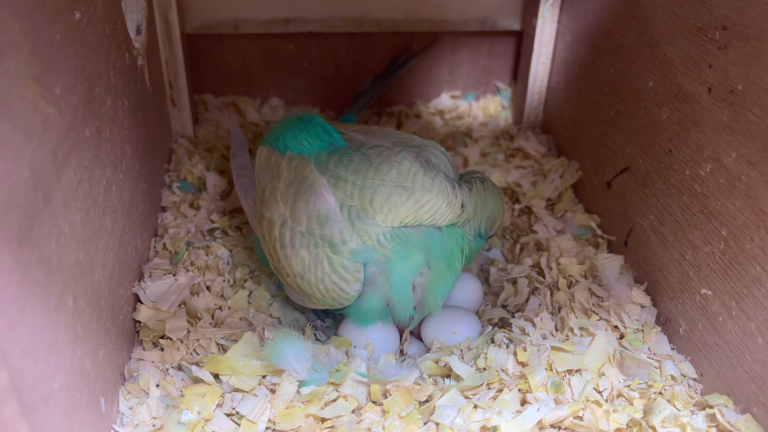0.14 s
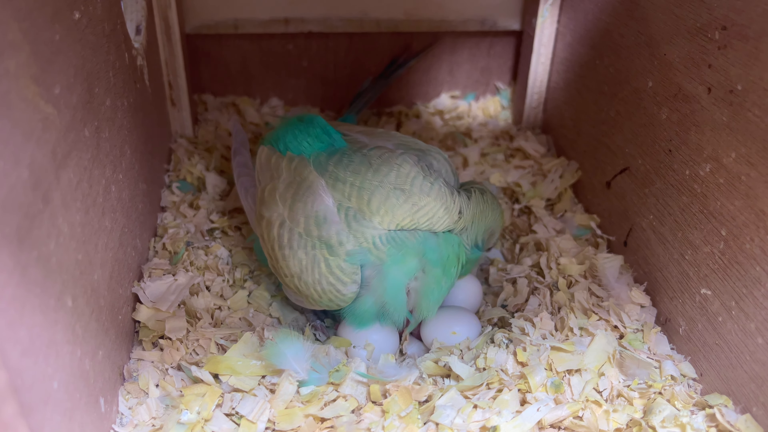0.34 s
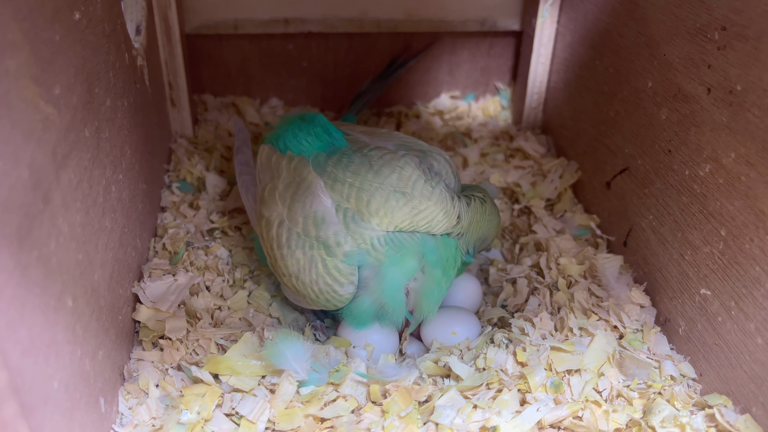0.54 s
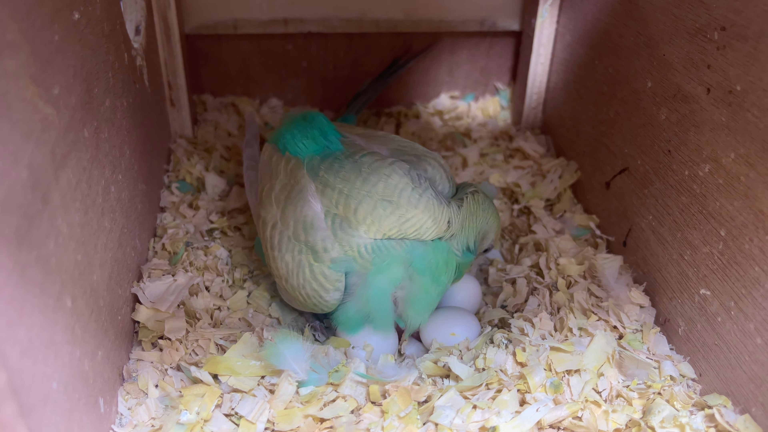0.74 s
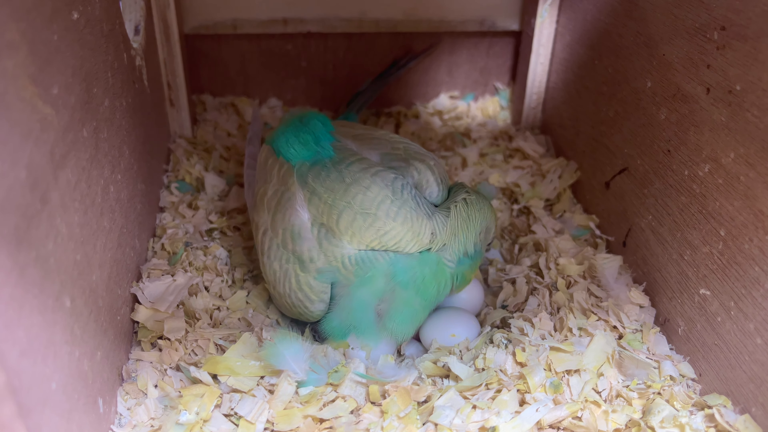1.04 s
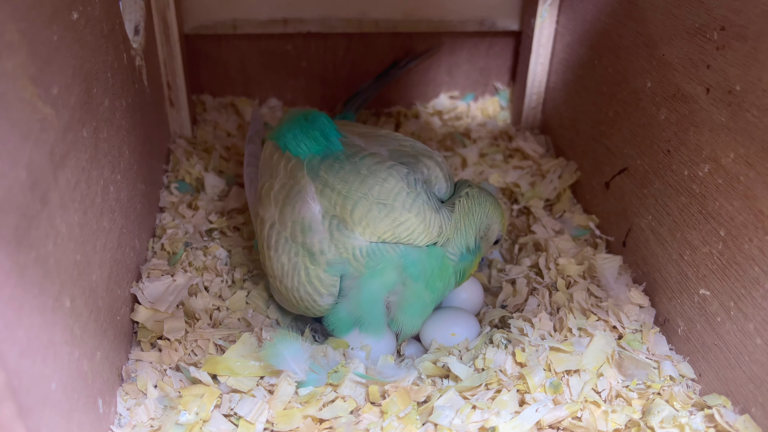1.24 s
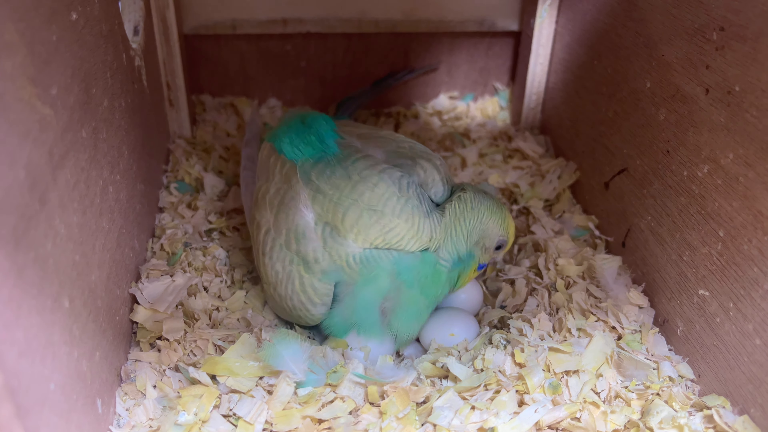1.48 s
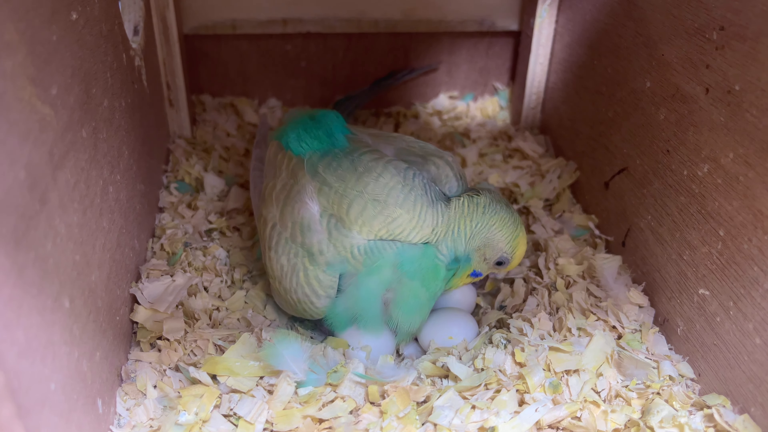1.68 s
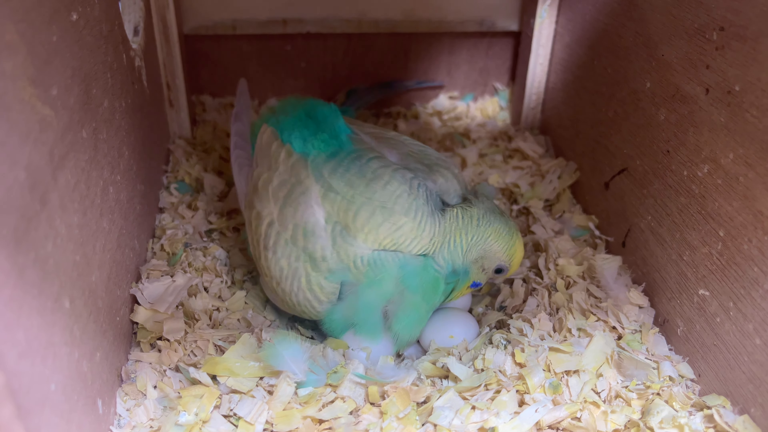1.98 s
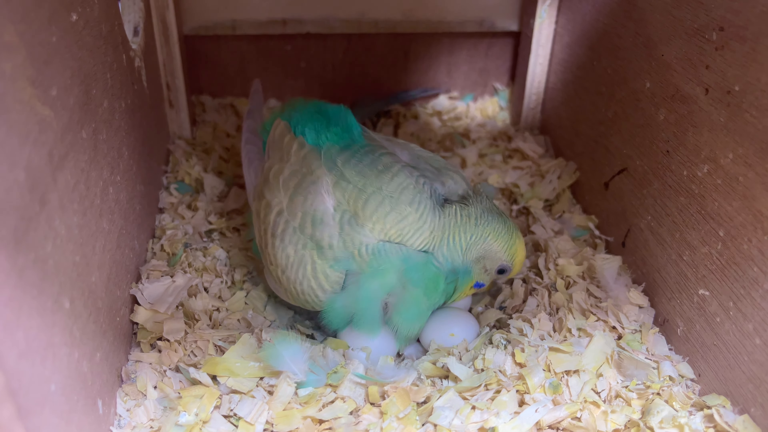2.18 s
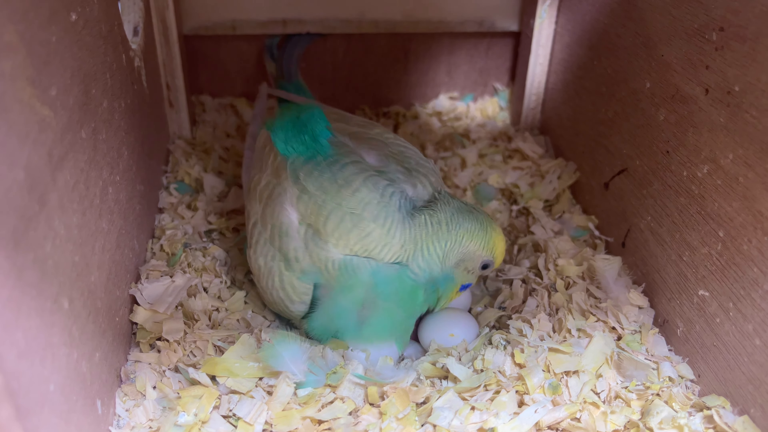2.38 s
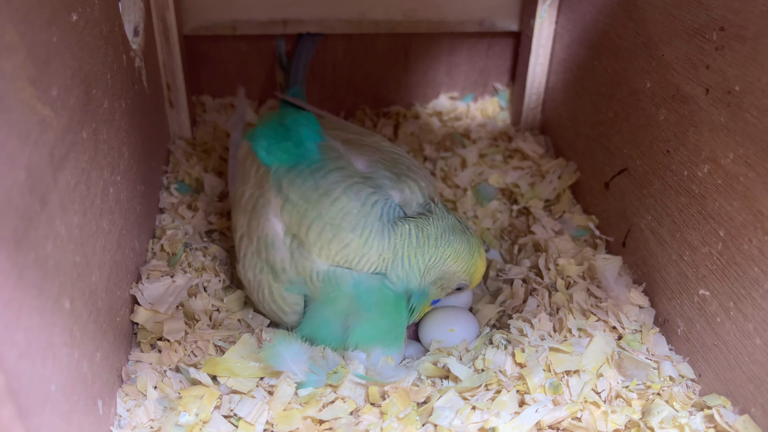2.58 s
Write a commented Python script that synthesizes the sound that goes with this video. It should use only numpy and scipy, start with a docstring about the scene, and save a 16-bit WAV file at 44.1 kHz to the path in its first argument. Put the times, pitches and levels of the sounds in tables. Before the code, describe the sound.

Short hoarse squawks of a small parrot outside a wooden nest box, after a high trill at 0-0.2 s, recur from 0.2 to 2.4 s. Close to the microphone a hen rumbles and scrapes, with a strong thump at 0.8 s. Shuffling eases around 1.4-1.75 s despite a knock, then resumes with crackly scratches near 2 s. Rough chips, warble and trills finish from 2.25 s over faint hiss.

```python
"""First a high trill over a faint rumble and hiss; then a small parrot squawks hoarsely again and again outside
a wooden nest box in a small room. Trills, chips and a low warble are tones on moving pitches; squawks are uneven
clicks and puffs of air through a throat. The hen shuffles on the shavings near the microphone: shaped noise
rumbles, scrapes, rustles and scratches, while fading tones make the box thump and knock. Grainy noise also adds
rough chatter near the end."""
import sys
import numpy as np
from scipy import signal
from scipy.fft import rfft, irfft, next_fast_len
from scipy.io import wavfile
from scipy.ndimage import uniform_filter1d, map_coordinates

SR = 44100
rng = np.random.default_rng(int(sys.argv[2]) if len(sys.argv) > 2 else 0)


def level_to_linear(level):
    """Convert decibel levels to linear amplitude factors, elementwise."""
    exponent = np.asarray(level, float) / 20
    return 10 ** exponent


def inscribe(sig):
    """Save sig as 16-bit PCM at rate SR to the path in sys.argv[1].

    A 1-D sig is mono; a 2-D sig holds one channel per row.
    Samples are clipped to [-1, 1] before scaling.
    """
    pcm = np.round(np.clip(np.atleast_2d(sig).T, -1, 1) * 32767)
    wavfile.write(sys.argv[1], SR, pcm.astype(np.int16))


N = 119070  # samples, 2.7 s

# Background hiss of far birds and room, tone colour: f/Hz, relative level/dB per Hz
FLOOR_COLOUR = [(30, -30), (60, -10), (120, -5), (400, -8), (790, -10.5), (1200, -12.5), (2400, -8),
                (5500, -8), (9300, -9.5), (12200, -14.5), (13000, -57)]
# Its loudness before a random wobble: t/s, level/dB
FLOOR_LEVEL = [(0, -68), (.04, -61), (.2, -51), (1.0, -49.5), (1.65, -59), (2.1, -54), (2.7, -49.5)]
# The hen's shuffling before a random wobble: t/s, rumble level/dB, scrape level/dB
SHUFFLE_LEVEL = [(0, -53, -74), (.11, -50.5, -67), (.13, -41.5, -56), (.2, -38, -47), (.35, -38, -51.5),
                 (.5, -45.5, -62), (.6, -31.5, -44.5), (.68, -38.5, -51.5), (.75, -27.5, -46.5),
                 (.88, -37.5, -54), (1.0, -36.5, -50.5), (1.1, -46, -59.5), (1.25, -35.5, -69),
                 (1.309, -40, -54), (1.33, -57, -64), (1.42, -72, -62.5), (1.5, -55.5, -50.5),
                 (1.6, -64, -60.5), (1.76, -63, -54), (1.791, -42.5, -47.5), (1.9, -38, -46.5),
                 (1.96, -33.5, -42.5), (2.09, -36, -50), (2.14, -45.5, -57), (2.201, -46.5, -54.5),
                 (2.3, -38.5, -59.5), (2.43, -65.5, -55), (2.7, -65, -70)]
# Tone colour of the box rumbling under her weight: f/Hz, relative level/dB per Hz
RUMBLE_COLOUR = [(13, -38), (22, -26), (43, 2), (65, 2.5), (140, -8.5), (272, -20.5), (300, -18.5),
                 (390, -70), (660, -120)]
# Tone colour of her scraping feet: f/Hz, relative level/dB per Hz
SCRAPE_COLOUR = [(88, -32), (150, -6.5), (344, -3), (486, -4.5), (827, -7.5), (1060, -22), (1300, -8),
                 (1690, -68), (2860, -120)]
# High trill notes: start t/s, length/s, first f/Hz, middle f/Hz, last f/Hz, level/dB, octave level/dB
TRILL_NOTES = [(0.025, 0.033, 4120, 3470, 4500, -50, -51), (0.055, 0.055, 4350, 5580, 4370, -47, -49.5),
               (0.098, 0.025, 4430, 4410, 4300, -56, -45), (0.135, .042, 4390, 5470, 4430, -48, -47),
               (0.164, 0.025, 4400, 4570, 4750, -56, -46), (0.915, 0.048, 4680, 5090, 4500, -48, -65),
               (0.946, 0.021, 4740, 4370, 4100, -63, -50), (1.713, 0.017, 3980, 4000, 3870, -51.5, -58),
               (1.727, 0.042, 3420, 4450, 5440, -52, -51), (2.546, 0.0085, 3800, 3900, 3800, -47, -47),
               (2.555, 0.021, 5070, 5360, 4800, -51, -53.5), (2.576, 0.038, 4340, 5260, 4500, -47.5, -44),
               (2.579, 0.029, 4340, 3770, 3300, -44.5, -72), (2.654, 0.043, 4490, 5580, 4120, -47.5, -46.5)]
# Short rough chips: start t/s, length/s, first f/Hz, middle f/Hz, last f/Hz, level/dB
CHIP_NOTES = [(2.258, 0.015, 2560, 2734, 2620, -35.5), (2.272, 0.013, 2710, 2650, 2600, -35),
              (2.279, .015, 1850, 1640, 1370, -38.5), (2.287, 0.026, 2720, 2570, 2800, -40.5),
              (2.308, 0.044, 2210, 2114, 2170, -39.5), (2.32, 0.01, 1330, 1306, 1270, -34.5),
              (2.334, 0.019, 1300, 1280, 1190, -42), (2.359, 0.01, 1530, 1770, 1640, -34),
              (2.374, 0.015, 1850, 1760, 1650, -32.5), (2.389, 0.021, 1600, 1683, 1920, -34.5),
              (2.568, 0.019, 1160, 1350, 1710, -45.5), (1.009, 0.019, 1195, 1246, 1380, -40),
              (1.185, 0.042, 3380, 3166, 3380, -44), (1.188, 0.019, 2500, 2820, 2500, -41),
              (1.36, 0.019, 2900, 2810, 2720, -48), (1.378, 0.029, 2850, 2800, 2720, -38.5),
              (0.355, 0.035, 1250, 1302, 1410, -49.5)]
# Squawks: start t/s, length/s, level before swell/dB, low throat f/Hz, high throat f/Hz, low over high/dB,
# swell/dB (added twice at the start, four times at the end), valley between resonances/dB, attack/s
SQUAWK_CALLS = [(0.196, 0.093, -20, 3580, 6400, -7, -0.5, -11, 0.01),
                (0.371, .12, -19.5, 3585, 6320, 0.5, 0, -8.5, 0.026),
                (0.563, 0.11, -17, 3650, 6560, -5.5, -1, -11.5, 0.019),
                (0.776, 0.12, -22, 3160, 5810, 1.5, -1, -11.5, 0.0064),
                (1.018, 0.14, -19.5, 3500, 6010, 2, 0.5, -4.5, 0.04),
                (1.249, 0.088, -20, 3630, 6120, -1.5, 0.63, -2, 0.018),
                (1.467, 0.079, -28.5, 3820, 6410, -9, 1.5, -10.5, 0.021),
                (1.768, 0.074, -22.5, 3430, 6320, -12, 0.6, -7.5, 0.018),
                (2.163, 0.076, -22, 3550, 6260, -7, 0, -4.5, 0.012),
                (2.341, 0.08, -19.5, 5120, 6440, -10.5, 0, -8.5, 0.026)]
# One share per squawk: how far the low throat resonance moves from the middle to either end
THROAT_SLIDES = [0.11, -0.00096, -.04, -0.059, 0.083, 0.012, 0.1, .01, -0.00054, .01]
# Tone colour of the squawking voice: f/Hz, relative level/dB per Hz
VOICE_COLOUR = [(530, -76), (900, -94), (1040, -30.5), (1730, -17), (2740, -4.5), (3710, -4.5), (4540, -1),
                (6360, -6), (7780, -8), (9210, -7.5), (11200, -9.5), (13200, -17.5)]
# Low warbles, one list each: t/s, pitch f/Hz, level/dB
WARBLE_CURVES = [
    [(0.49, 1490, -51), (0.516, 1277, -43.5), (0.582, 1320, -40), (0.6, 1200, -73)],
    [(1.207, 2720, -52), (1.212, 2490, -34.5), (1.23, 2160, -39), (1.24, 2250, -32.5), (1.244, 2400, -44),
     (1.252, 2430, -39), (1.27, 2720, -39)],
    [(1.455, 1814, -46), (1.468, 1486, -45), (1.478, 1450, -48), (1.5, 1660, -58)],
    [(2.415, 1695, -45), (2.425, 1540, -44), (2.44, 1382, -36), (2.449, 1463, -40), (2.455, 1790, -40.5),
     (2.495, 2230, -46), (2.518, 2136, -55), (2.535, 2220, -42), (2.549, 2590, -39), (2.565, 2665, -39),
     (2.579, 2650, -40), (2.591, 1933, -44.5), (2.606, 1670, -38.5)],
    [(2.665, 1570, -71), (2.677, 1580, -47), (2.7, 1530, -54)],
]
# Soft thumps on the box: t/s, level/dB, pitch factor
THUMP_HITS = [(.825, -14.5, 1.01), (1.222, -29, 0.8), (1.9344, -27.5, 1.144), (2.247, -19.5, 0.95)]
# Ringing tones of the whole box: f before the pitch factor/Hz, relative level/dB, time to fade by 60 dB/s
BOX_TONES = [(69, 7, 0.046), (96.6, -1, 0.099), (167.7, 8, 0.046), (325, -3.5, 0.0396)]
# Hard knocks on the wall: t/s, ring level/dB, hardness/dB per octave, crack level/dB
KNOCK_HITS = [(1.4404, -28.5, 3, -47), (1.4457, -24.5, -0.5, -57), (1.9313, -28.5, 10, -20)]
# Ringing tones of the wall: f/Hz, relative level/dB, time to fade by 60 dB/s
WALL_TONES = [(348, -12.5, .09), (424, 2.5, 0.031), (478, -18, 0.064), (790, 0.5, 0.021),
              (893.5, -8.5, 0.054), (1350, -7, 0.016), (1920, -10.5, 0.014)]
# Grainy noise, rustling shavings near 2 s, then rough chatter from 2.24 s: t/s, level/dB
GRAIN_LEVEL = [(1.94, -36), (1.952, -49), (1.962, -38), (2.02, -41.5), (2.066, -59.5), (2.16, -73),
               (2.24, -40.5), (2.33, -45), (2.44, -35), (2.5, -71)]
# Short scratches in the shavings: t/s, level/dB, middle f/Hz
SCRATCH_PUFFS = [(1.9619, -32.5, 4830), (1.9822, -28, 4900), (2.001, -39, 5900), (2.0154, -35, 4990)]
# Dying away of the room: f/Hz, time to fade by 60 dB/s
ROOM_FADE = [(1000, 0.24), (3500, 0.18), (6500, 0.19), (12000, 0.095)]
# How far the left channel's phase leads the right's for squawks: f/Hz, lead/radians
SQUAWK_LEAD = [(0, -11.5), (260, -13), (1380, -13.5), (3450, -16.5), (5600, -18.5), (7240, -17.5),
               (8270, -19), (8870, -17.5), (9730, -30), (12700, -23), (16400, -32)]
# Treble of the microphone: f/Hz, level/dB
MICROPHONE_TREBLE = [(9600, 0), (10150, -18), (10700, 2), (12900, 0), (13800, -45), (14500, -15),
                     (15600, -1), (16300, -62)]

PULSE_HZ, JITTER, SIZE_DB = 176.3, 0.2, 2  # voice pulses: rate, uneven share of the rate, uneven size
CLICK_SHARE, BREATH_SHARE = 0.2, 0.5  # clicks against puffs; steady air beneath the puffs
LOW_WIDTH_HZ, HIGH_WIDTH_HZ = 1200, 1400  # widths of the two throat resonances
RIPPLE_DB, RIPPLE_HZ = 4, 130  # random bumps over the voice: size, spacing
RELEASE_S = 0.029  # fade at the end of a squawk
WAVER, FLUTTER_DB, GLIDE_S = 0.012, 2, 0.006  # share of pitch, wobble of level, smoothing of warble pitch
HOARSE, HOARSE_HZ = 0.4, 700  # roughness of chips: share of strength, speed
SONG_LEAD = 1.44  # radians by which the left leads the right
SQUAWK_ROOM_DB, SONG_ROOM_DB, HIT_ROOM_DB = -5.5, -13, -10  # how much of each is sent into the room


def unit(x):
    """Scales a sound to rms 1."""
    return x / np.sqrt(np.mean(x ** 2) + 1e-20)


def along(points, hz):
    """Reads (f/Hz, value) points on a log frequency axis."""
    f, value = np.transpose(points)
    return np.interp(np.log(hz + 1), np.log(f + 1), value)


def wobble(rate, size=N):
    """A smooth random curve through `rate` random points a second."""
    knots = rng.standard_normal(int(size * rate / SR) + 4)
    return map_coordinates(knots, [np.arange(size) * rate / SR])


def filtered(x, response):
    """Multiplies the spectrum of x by a response, which may be complex, of frequency."""
    n = x.shape[-1]
    padded = next_fast_len(n + 8192)
    spectrum = rfft(x, padded) * response(np.fft.rfftfreq(padded, 1 / SR))
    return irfft(spectrum, padded)[..., :n]


def add(out, start_s, x):
    """Mixes x into out from the given time, cut at the end."""
    part = out[..., round(start_s * SR):][..., :x.shape[-1]]
    part += x[..., :part.shape[-1]]


def pair(colour, alike):
    """Coloured stereo noise of rms 1; alike is how closely left follows right."""
    a, b = filtered(rng.standard_normal((2, N)), lambda hz: level_to_linear(along(colour, hz)))
    angle = np.arccos(np.clip(alike, -1, 1)) / 2
    middle, side = np.cos(angle) * a, np.sin(angle) * b
    return unit(np.array([middle + side, middle - side]))


def background():
    """Far birds and the room blur into coloured noise that slowly swells and sinks."""
    level_db = np.interp(np.arange(N) / SR, *np.transpose(FLOOR_LEVEL))
    return level_to_linear(level_db + 2.1 * wobble(16)) * pair(FLOOR_COLOUR, alike=0.059)


def shuffle():
    """The hen's weight rumbles the box as low noise; her feet scrape as higher noise."""
    s, rumble_db, scrape_db = np.transpose(SHUFFLE_LEVEL)
    t = np.arange(N) / SR
    rumble_level = level_to_linear(np.interp(t, s, rumble_db) + 2.2 * wobble(18))
    scrape_level = level_to_linear(np.interp(t, s, scrape_db) + 3 * wobble(40))
    rumble = rumble_level * pair(RUMBLE_COLOUR, alike=0.6)
    return rumble + scrape_level * pair(SCRAPE_COLOUR, alike=0.1)


def whistle(hz, levels_db, hoarse=0):
    """A wavering, fluttering tone on a pitch curve, perhaps hoarse; further levels are overtones."""
    n = len(hz)
    turn = 2 * np.pi * np.cumsum(hz * (1 + WAVER * wobble(297, size=n))) / SR
    to_nearest_end = np.minimum(np.arange(n), np.arange(n)[::-1])
    edge = np.clip(to_nearest_end / (0.004 * SR), 0, 1)  # soft ends of 4 ms
    edge = edge * (1 + hoarse * wobble(HOARSE_HZ, size=n))
    tone = np.zeros(n)
    for k, db in enumerate(levels_db):
        level = np.sqrt(2) * level_to_linear(db + FLUTTER_DB * wobble(158.4, size=n))
        tone += level * np.sin((k + 1) * turn)
    return edge * tone


def trills_and_chips():
    """Each note's pitch follows a parabola through three pitches; chips are hoarse and have no octave."""
    out = np.zeros(N)
    for s, length, first_hz, middle_hz, last_hz, *levels_db in TRILL_NOTES + CHIP_NOTES:
        u = np.linspace(-1, 1, round(length * SR))
        slope = (last_hz - first_hz) / 2
        bend = (first_hz + last_hz) / 2 - middle_hz
        is_chip = len(levels_db) == 1
        add(out, s, whistle(middle_hz + u * slope + u ** 2 * bend, levels_db, hoarse=HOARSE * is_chip))
    return out


def resonance(f, centre_hz, width_hz):
    """A hollow that answers most strongly at its own frequency."""
    return 1j * f * width_hz / (centre_hz ** 2 - f ** 2 + 1j * f * width_hz)


def squawks():
    """The voice box snaps in uneven pulses, each a click and a puff of air, through two throat resonances."""
    out, t = np.zeros(N), np.arange(SR // 4) / SR
    stage = np.array([[-1], [0], [1]])  # throat at the start, middle and end
    for call, slide in zip(SQUAWK_CALLS, THROAT_SLIDES):
        s, length, db, low_hz, high_hz, low_db, swell_db, valley_db, attack = call
        turn = np.cumsum(PULSE_HZ * (1 + JITTER * wobble(150, size=len(t)))) / SR
        sizes = level_to_linear(SIZE_DB * rng.standard_normal(200))[turn.astype(int) % 200]
        clicks = unit(sizes * np.diff(np.floor(turn), prepend=0))
        air = BREATH_SHARE + sizes * np.sin(np.pi * turn + 1) ** 4
        puffs = unit(air * rng.standard_normal(len(t)))
        source = CLICK_SHARE * clicks + (1 - CLICK_SHARE) * puffs
        bumps = rng.standard_normal((3, int(SR / 2 / RIPPLE_HZ) + 4))

        def throat(f):
            ripple_db = RIPPLE_DB * np.array([map_coordinates(row, [f / RIPPLE_HZ]) for row in bumps])
            low = level_to_linear(low_db) * resonance(f, low_hz * (1 + slide * stage), LOW_WIDTH_HZ) ** 2
            high = resonance(f, high_hz, HIGH_WIDTH_HZ) ** 2
            return level_to_linear(along(VOICE_COLOUR, f) + ripple_db) * (level_to_linear(valley_db) + low + high)

        stages = filtered(source, throat)
        # cross-fade from one throat shape to the next
        fade = np.clip(1 - np.abs(np.clip(2 * t / length - 1, -1, 1) - stage), 0, 1)
        voice = unit(np.sum(np.sqrt(fade) * stages, axis=0))
        rise = np.clip(t / max(attack, 0.003), 0, 1) ** 2
        fall = np.clip((length - t) / RELEASE_S, 0, 1)
        add(out, s, voice * rise * fall * level_to_linear(db + swell_db * (2 * t / length + 2)))
    return out


def warbles():
    """A low whistle whose pitch glides along each curve while its level rises and falls."""
    out = np.zeros(N)
    for rows in WARBLE_CURVES:
        s, hz, db = np.transpose(rows)
        t = np.arange(s[0], s[-1], 1 / SR)
        pitch = uniform_filter1d(np.interp(t, s, hz), max(1, int(GLIDE_S * SR)), mode="nearest")
        add(out, s[0], whistle(pitch, [np.interp(t, s, db)]))
    return out


def thumps():
    """Soft blows make the whole box ring in a few low tones that die away."""
    out, t = np.zeros(N), np.arange(SR // 4) / SR
    for s, db, pitch in THUMP_HITS:
        ring = sum(level_to_linear(db + tone_db - 60 * t / t60) * np.sin(2 * np.pi * f * pitch * t)
                   for f, tone_db, t60 in BOX_TONES)
        add(out, s, (1 - np.exp(-t / 0.0056)) * ring)
    return out


def knocks():
    """Hard blows ring the wall, with a bright crack of noise; hardness tilts the tones about 600 Hz."""
    out, t = np.zeros(N), np.arange(SR // 4) / SR
    for s, db, hard_db, crack_db in KNOCK_HITS:
        ring = np.zeros(len(t))
        for f, tone_db, t60 in WALL_TONES:
            level_db = tone_db + hard_db * np.log2(f / 600) + rng.normal(0, 1)
            ring += level_to_linear(level_db - 60 * t / t60) * np.sin(2 * np.pi * f * t)
        crack = level_to_linear(crack_db - 60 * t / 0.022) * rng.standard_normal(len(t))
        add(out, s, level_to_linear(db) * (1 - np.exp(-t / 0.001)) * ring + crack)
    return out


def grainy_noise():
    """Bright noise with a quick flicker: rustle of the shavings near 2 s, then rough chatter from 2.24 s."""
    colour = [(900, -20), (1500, -12.5), (2500, -9), (5000, -8.5), (8000, -10), (12000, -24), (13500, -55)]
    grains = unit(level_to_linear(3.3 * wobble(130)) * pair(colour, alike=0.034))
    level_db = np.interp(np.arange(N) / SR, *np.transpose(GRAIN_LEVEL), left=-120, right=-120)
    return grains * level_to_linear(level_db)


def scratches():
    """Short scratches in the shavings: puffs of noise in one narrow band."""
    out, t = np.zeros(N), np.arange(SR // 20) / SR
    for s, db, hz in SCRATCH_PUFFS:
        noise = rng.standard_normal(len(t))
        puff = unit(filtered(noise, lambda f: np.exp(-((f - hz) / 400) ** 2)))
        add(out, s, level_to_linear(db - 60 * t / 0.043) * (1 - np.exp(-t / 0.0012)) * puff)
    return out


def room(x):
    """Each frequency of the echo dies at its own speed; the random echo tail is drawn afresh every 0.2 s."""
    out, step = np.zeros((2, N)), SR // 5
    for start in range(0, N, step):
        hz, t, z = signal.stft(rng.standard_normal((2, SR // 3)), SR, nperseg=256)
        fade = level_to_linear(-60 * t / along(ROOM_FADE, hz)[:, None])
        tail = signal.istft(z * fade, SR, nperseg=256)[1]
        tail = tail / np.linalg.norm(tail[0])
        echo = signal.fftconvolve(x[None, start:start + step], tail, axes=1)
        add(out, (start + 300) / SR, echo)  # echo starts 300 samples late
    return out


def scene():
    """Birds reach the two ports through the box walls, with a phase that, for squawks, turns over frequency."""
    calls = squawks()
    tunes = trills_and_chips() + warbles() + scratches()
    hits = thumps() + knocks()

    def squawk_phase(hz):
        half = np.interp(hz, *np.transpose(SQUAWK_LEAD)) / 2
        return np.exp(1j * np.array([half, -half]))

    def song_phase(hz):
        return np.exp(0.5j * SONG_LEAD * np.array([[1], [-1]])) * (hz > 0)

    near = filtered(calls, squawk_phase) + filtered(tunes, song_phase)
    far = room(level_to_linear(SQUAWK_ROOM_DB) * calls + level_to_linear(SONG_ROOM_DB) * tunes + level_to_linear(HIT_ROOM_DB) * hits)
    near_hits = hits * level_to_linear([[1.1], [-1.1]])  # a little louder on the left
    return near + far + near_hits + shuffle() + grainy_noise() + background()


def low_pass(x):
    """Removes everything above the highest recorded frequency."""
    return signal.sosfilt(signal.butter(12, 16790, fs=SR, output="sos"), x)


def record(dry):
    """A small microphone without deep bass and with two dips in the treble."""
    def microphone(hz):
        return level_to_linear(along(MICROPHONE_TREBLE, hz)) * hz ** 4 / (hz ** 4 + 38 ** 4)

    return low_pass(filtered(dry, microphone))


dry = scene()
out = record(dry)
inscribe(out)
```